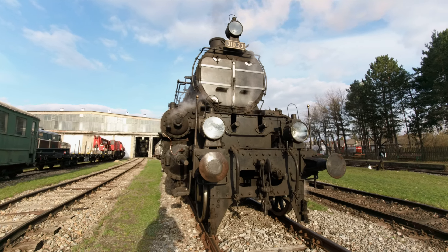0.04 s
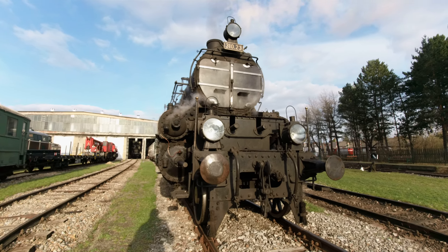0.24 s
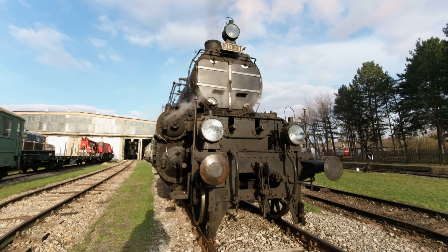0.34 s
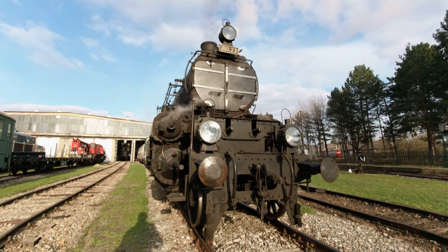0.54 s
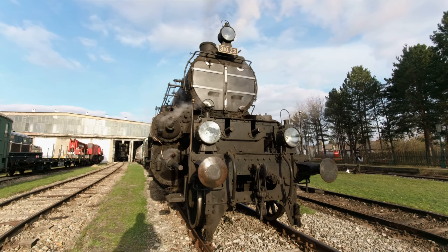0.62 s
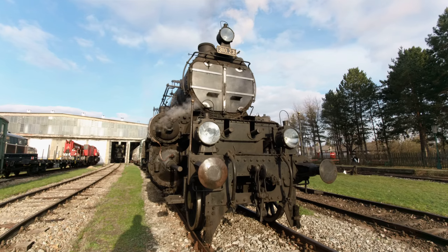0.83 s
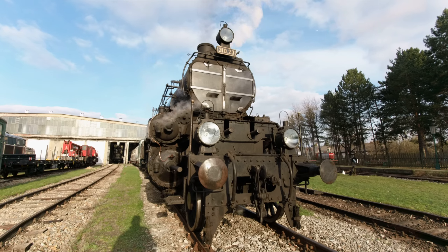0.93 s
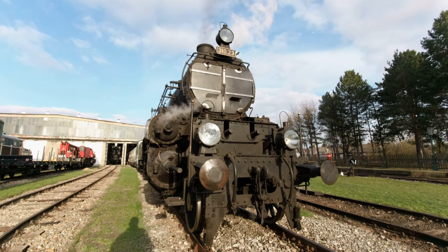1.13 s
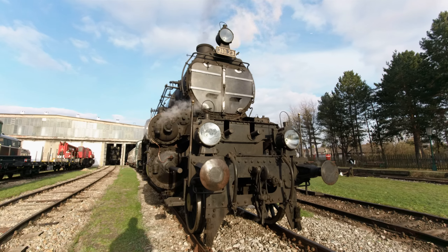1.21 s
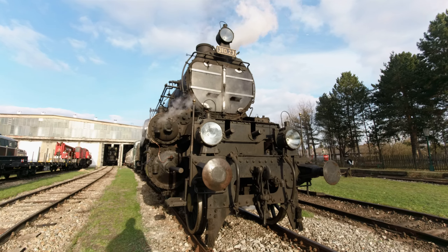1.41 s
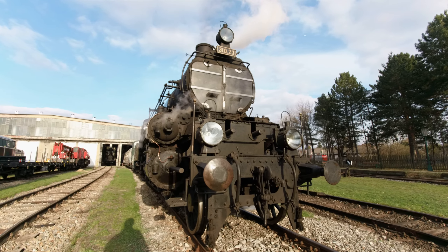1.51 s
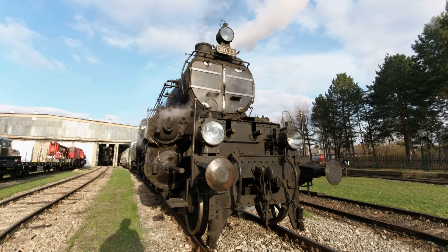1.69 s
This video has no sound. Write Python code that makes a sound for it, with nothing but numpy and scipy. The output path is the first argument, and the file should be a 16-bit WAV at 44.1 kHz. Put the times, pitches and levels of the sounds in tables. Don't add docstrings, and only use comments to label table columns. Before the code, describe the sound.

Steam hisses evenly from a standing locomotive throughout, over a faint boiler roar, fading very slightly. Tiny sharp spits snap within the first 0.15 seconds. Wind thumps a small stereo camera microphone, strongest around 0.3 seconds and mainly left, with lesser bumps near 0.7 and 1.0. A soft chuff comes at 0.45, dull iron knocks ring faintly around 0.65-0.8, and a stronger airy chuff swells at 1.2, then dies away.

```python
import sys
import numpy as np
from scipy import signal
from scipy.fft import rfft, irfft
from scipy.io import wavfile
from scipy.ndimage import uniform_filter1d

SR = 44100
rng = np.random.default_rng(int(sys.argv[2]) if len(sys.argv) > 2 else 0)


def wav_out(sig):
    wavfile.write(sys.argv[1], SR, np.round(np.clip(np.atleast_2d(sig).T, -1, 1) * 32767).astype(np.int16))


def attenuation_scalar(level_db):
    decades = np.asarray(level_db, float) / 20
    return 10 ** decades


N = 77175


def table(rows, hz):
    rows = np.array(rows, float)
    return np.interp(np.log(np.maximum(hz, 1)), np.log(rows[:, 0]), rows[:, 1])


def unit(x):
    return x / np.sqrt(np.mean(x ** 2))


def walk(count, size, hold):
    span = max(int(hold), 1)
    smooth = uniform_filter1d(rng.standard_normal((count, size)), span, mode="wrap")
    return unit(uniform_filter1d(smooth, span, mode="wrap"))


def colour(rows, count):
    hz = np.fft.rfftfreq(N, 1 / SR)
    white = rfft(rng.standard_normal((count, N)))
    return unit(irfft(white * attenuation_scalar(table(rows, hz)), N))


def even(x, span_s):
    span = int(span_s * SR)
    power = uniform_filter1d(uniform_filter1d(x ** 2, span), span)
    return x / np.sqrt(power + 0.017)


def turbulent(x, shape_db, swell_db, flicker_db):
    frame = 512
    hz, t, z = signal.stft(x, SR, nperseg=frame)
    frames_per_s = 2 * SR / frame
    swell = unit(uniform_filter1d(walk(len(hz), len(t), frames_per_s / 3.4), size=48, axis=0))
    flicker = unit(uniform_filter1d(walk(len(hz), len(t), frames_per_s / 30.), size=8, axis=0))
    db = shape_db(hz[:, None], t) + swell_db * swell + flicker_db * flicker
    return signal.istft(z * attenuation_scalar(db), SR, nperseg=frame)[1][:, :N]


def leak():
    # frequency in Hz, level in dB per Hz.
    leak_spectrum = [(280, -1), (450, 2.5), (1150, -4.5), (1800, -4), (2150, -7), (4500, -3.5),
                     (7500, -2.5), (11000, -8)]
    level_db, fade_db_per_s = -56.5, -0.42

    def shape(hz, t):
        return level_db + fade_db_per_s * t + 0 * hz

    return turbulent(colour(leak_spectrum, count=3), shape, swell_db=0.97, flicker_db=1.0)


def knocks():
    # start in seconds, pitch in Hz, level in
    # dB, time to fall 60 dB in seconds.
    iron_rings = [(.136, 4500, -55, .03), (0.512, 1155, -73, 1), (.545, 361.3, -74, 1.8),
                  (.66, 1048, -57, 0.35), (.66, 780, -61.5, 0.23), (.66, 1305, -78, 0.23),
                  (0.671, 1880, -67, 0.24), (.7, 1200, -67.5, .9), (0.739, 240, -51, 0.35),
                  (0.739, 466, -62, 0.3), (.74, 1482, -68, 0.53), (.8, 830.5, -67, 0.64),
                  (.8, 426.6, -69, .6), (1.48, 42.4, -52.5, 5.6), (.001, 41.63, -55, 11)]
    rise_s = 0.0037
    out = np.zeros(N)
    for (start, hz, db, t60), turn in zip(iron_rings, rng.random(len(iron_rings))):
        t = np.maximum(np.arange(N) / SR - start, 0)
        rise = 1 - np.exp(-t / min(rise_s, t60 / 10))
        decay = np.exp(-np.log(1000) * t / t60)
        out = out + attenuation_scalar(db) * rise * np.sin(2 * np.pi * (hz * t + turn)) * decay
    return out * np.ones((3, 1))


def spits():
    # middle in seconds, level in dB, length in seconds.
    drops = [
        (.059, -52, .0007),
        (.076, -60, .002),
        (.1275, -55, .0007),
        (.135, -58, .008),
        (.1445, -46, .0006),
        (.146, -56, .003),
    ]
    # frequency in Hz, level in dB per Hz.
    spit_spectrum = [(2500, -40), (4200, -6), (5500, -7), (6800, 1.5), (8500, -5), (12000, -10),
                     (16000, -36.5)]
    t = np.arange(N) / SR
    level = sum(attenuation_scalar(db) * np.exp(-.5 * ((t - middle) / size) ** 2) for middle, db, size in drops)
    return even(colour(spit_spectrum, count=3), 0.001) * level


def chuffs():
    # frequency in Hz, level in dB per Hz.
    exhaust_spectrum = [(100, -13.5), (220, 2), (500, 1.6), (900, 0), (2000, -3), (3500, -5), (7000, -13),
                        (12000, -22)]
    # start in seconds, level in dB, hold in seconds, fall in dB per second.
    puffs = [
        (0.436, -66.5, 0.13, 46),
        (0.65, -67, 0.029, 45),
        (1.173, -49.5, 0.16, 19.5),
        (1.245, -56, 0.077, 23),
    ]
    attack_s, treble_fall = 0.023, 0.095
    stack_hz, stack_rise_hz_per_s, stack_width_hz, stack_db = 780, 530, 120, 5

    def shape(hz, t):
        power = 1e-12
        for start, db, hold, fall in puffs:
            age = t - start
            rise = np.clip(age / attack_s, 0, 1)
            drop_db = fall * (np.maximum(hz, 100) / 1000) ** treble_fall * np.maximum(age - hold, 0)
            off_peak = 2 * (hz - stack_hz - stack_rise_hz_per_s * age) / stack_width_hz
            resonance_db = stack_db * np.exp(-.5 * off_peak ** 2)
            power = power + (rise * attenuation_scalar(db - drop_db + resonance_db)) ** 2
        return 10 * np.log10(power)

    return turbulent(colour(exhaust_spectrum, count=3), shape, swell_db=0.44, flicker_db=1.0)


def ports(air):
    # frequency in Hz, width in Hz, gain in dB.
    left_bumps = [(670, 100, -5), (1130, 130, 3.5), (1924, 170, -4.5), (2700, 310, 4.5), (3720, 580, 1.5),
                  (6600, 840, 5), (7710, 810, 8), (8770, 700, 3.5), (9700, 500, 2.5), (14400, 1000, 3)]
    right_bumps = [(422, 86, 9.5), (788, 142, 5.5), (1200, 140, 5), (2030, 190, -4.5), (2405, 214, 11.5),
                   (4670, 510, -10), (5220, 360, 3), (5870, 430, 4), (6730, 1020, -8.5), (11000, 1200, 3),
                   (13100, 2000, -3.5)]
    # frequency in Hz, shared part from 0 to 1.
    likeness = [(200, 0.97), (1300, 0.91), (1800, .97), (2100, 0.59), (2400, 0.4), (2900, 0.73),
                (3700, 0.27), (7000, 0.13)]
    # frequency in Hz, phase in radians.
    left_lead = [(100, -7), (600, -2.64), (1000, 1.39), (1900, 3), (2500, 5), (3700, 4), (6000, 8)]
    right_tilt_db_per_octave = -0.99

    def gain_db(bumps, hz):
        return sum(db * np.exp(-.5 * (2 * (hz - f) / width) ** 2) for f, width, db in bumps)

    hz = np.fft.rfftfreq(N, 1 / SR)
    both, left, right = rfft(air)
    alike = np.clip(table(likeness, hz), 0, 1)
    turn = np.exp(.5j * table(left_lead, hz))
    shared, apart = np.sqrt(alike) * both, np.sqrt(1 - alike)
    tilt_db = right_tilt_db_per_octave * np.log2(np.maximum(hz, 500) / 1000)
    at_left = (shared * turn + apart * left) * attenuation_scalar(gain_db(left_bumps, hz))
    at_right = (shared / turn + apart * right) * attenuation_scalar(gain_db(right_bumps, hz) + tilt_db)
    return irfft(np.array([at_left, at_right]), N)


def wind():
    # middle in seconds, level in dB, length in seconds.
    left_eddies = [(.08, -42, 0.0077), (0.151, -50.5, 0.014), (0.174, -49, 0.015), (0.231, -40.5, 0.011),
                   (0.273, -30, 0.0087), (.315, -26.5, 0.02), (0.349, -28, 0.013), (0.396, -32.5, 0.012),
                   (0.46, -44, 0.013), (0.506, -40.5, 0.016), (0.574, -47, .015), (0.656, -40, 0.012),
                   (0.723, -31, 0.014), (0.752, -38.5, 0.015), (0.862, -47, 0.034), (0.924, -45, 0.024),
                   (0.979, -33, .011), (1.012, -38, 0.0091), (1.053, -44.5, 0.017), (1.088, -48.5, .01),
                   (1.12, -52, .01), (1.183, -50, 0.012), (1.394, -49, .015), (1.459, -42, 0.014),
                   (1.588, -61, .03)]
    # time in seconds, level in dB.
    right_gust = [(0, -64), (.269, -51.5), (.304, -42), (.334, -38), (.359, -39), (.399, -46),
                  (.489, -42.5), (.519, -50.5), (.554, -46), (.604, -52.5), (.733, -53), (.843, -59.5),
                  (.958, -50), (1.023, -50), (1.048, -48.5), (1.098, -52.5), (1.472, -52), (1.746, -59.5)]
    # frequency in Hz, level in dB per Hz.
    rumble_spectrum = [(10, -3), (25, 0), (45, 5), (80, -7.5), (150, -21.5), (300, -40), (600, -67),
                       (2000, -110)]
    left_buffet = [(30, -11), (70, -1), (135, 2.5), (220, -5.5), (350, -21), (600, -43), (1300, -63),
                   (3000, -110)]
    right_buffet = [(30, -18), (70, -5.5), (130, 2.5), (300, 0), (500, -11.5), (900, -13), (1500, -31),
                    (3000, -84)]
    flutter_spectrum = [(100, -24), (190, -1.5), (300, 0.5), (400, -6), (600, -17), (900, -27.5),
                        (1500, -53), (3000, -100)]
    lull_db, strong_db = -57, -40
    rumble_db, rumble_growth, right_rumble_db = 0.9, 0.78, -4
    buffet_db, buffet_growth, right_buffet_db = -2.5, 1.155, 1
    flutter_db, flutter_growth = -17.5, 1.765
    eddy_db, eddies_per_s = 1.5, 54

    t = np.arange(N) / SR
    hits = sum(attenuation_scalar(db) ** 2 * np.exp(-((t - middle) / size) ** 2) for middle, db, size in left_eddies)
    left_db = 10 * np.log10(attenuation_scalar(lull_db) ** 2 + hits)
    right_db = np.interp(t, *np.array(right_gust).T)
    gust_db = np.array([left_db, right_db]) - strong_db
    eddy = eddy_db * walk(2, N, SR / eddies_per_s)

    rumble_level = rumble_db + strong_db + rumble_growth * gust_db + np.array([[0], [right_rumble_db]])
    buffet_level = buffet_db + strong_db + buffet_growth * gust_db + np.array([[0], [right_buffet_db]])
    flutter_level = flutter_db + strong_db + flutter_growth * gust_db
    buffet_noise = np.vstack([colour(left_buffet, count=1), colour(right_buffet, count=1)])
    rumble = attenuation_scalar(rumble_level + eddy / 2) * even(colour(rumble_spectrum, count=2), 0.029)
    buffet = attenuation_scalar(buffet_level + eddy) * even(buffet_noise, .015)
    flutter = attenuation_scalar(flutter_level + eddy) * colour(flutter_spectrum, count=2)
    return rumble + buffet + flutter


def scene():
    engine = ports(leak() + chuffs() + knocks())
    spit_balance = attenuation_scalar(np.array([[0], [-1]]))
    return engine + ports(spits()) * spit_balance + wind()


def low_pass(x):
    return signal.sosfilt(signal.butter(12, 15800, fs=SR, output="sos"), x)


def record(dry):
    return low_pass(dry)


dry = scene()
out = record(dry)
wav_out(out)
```